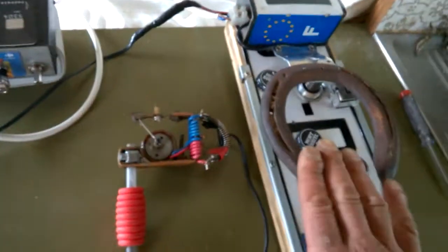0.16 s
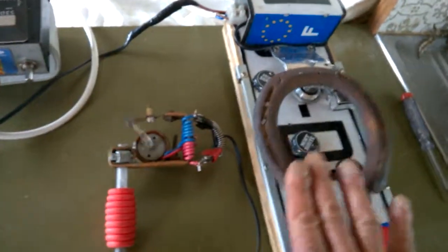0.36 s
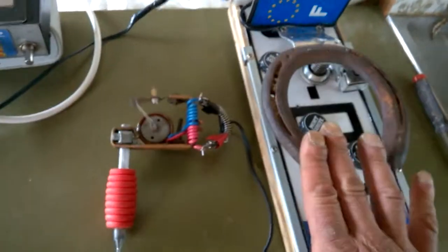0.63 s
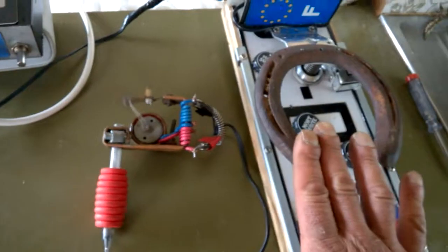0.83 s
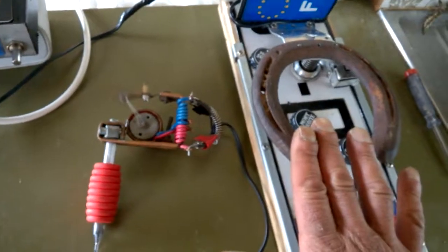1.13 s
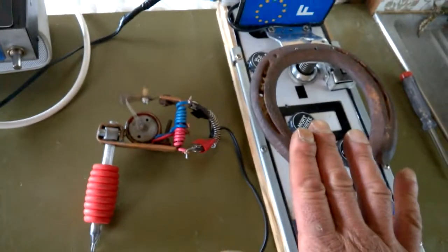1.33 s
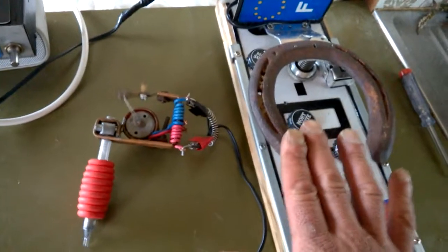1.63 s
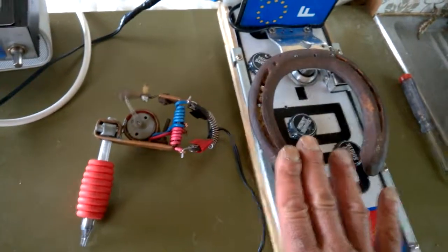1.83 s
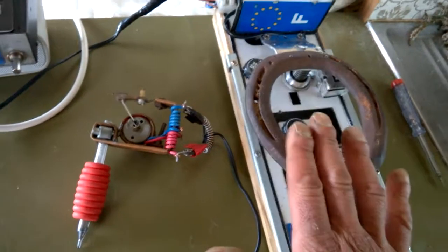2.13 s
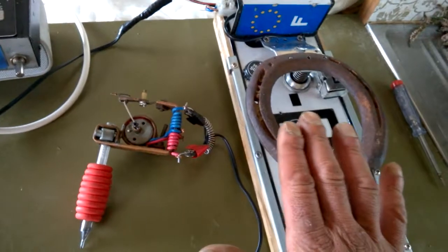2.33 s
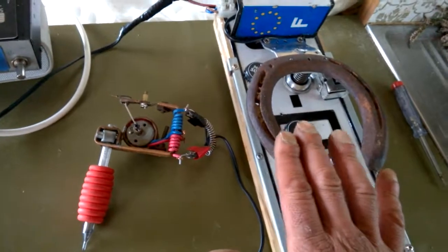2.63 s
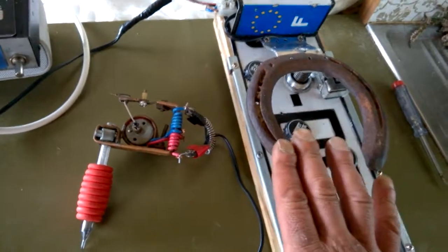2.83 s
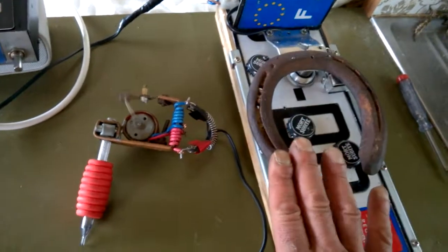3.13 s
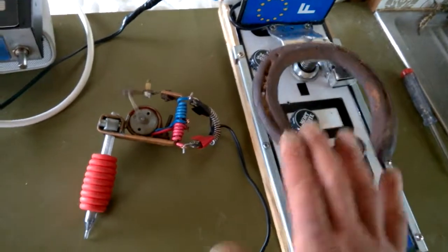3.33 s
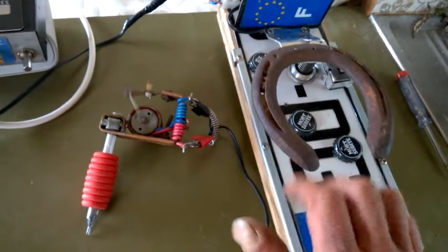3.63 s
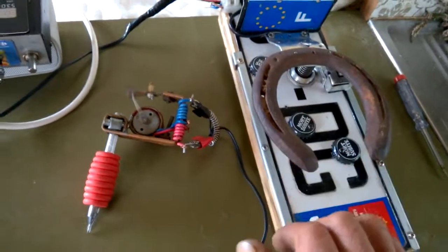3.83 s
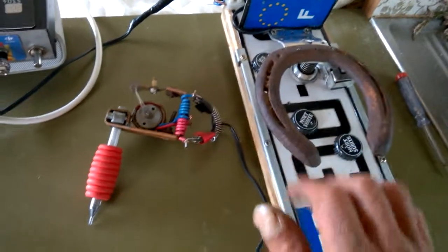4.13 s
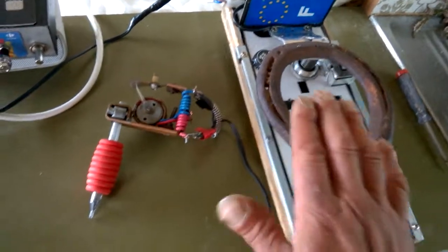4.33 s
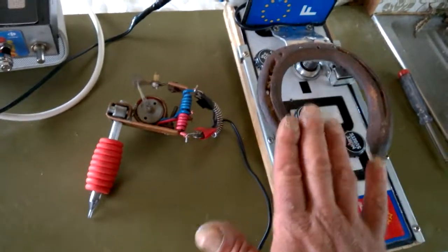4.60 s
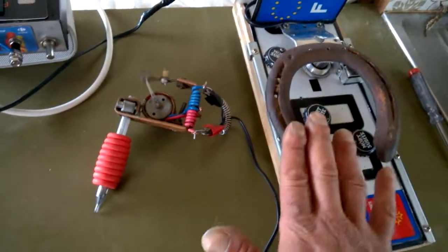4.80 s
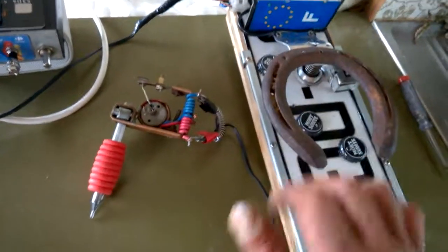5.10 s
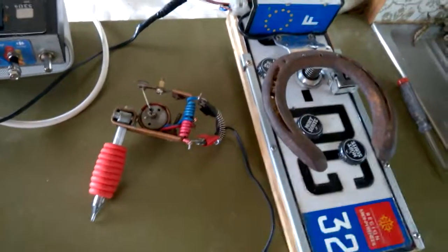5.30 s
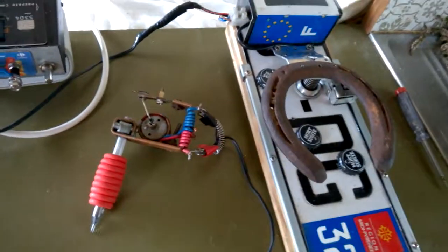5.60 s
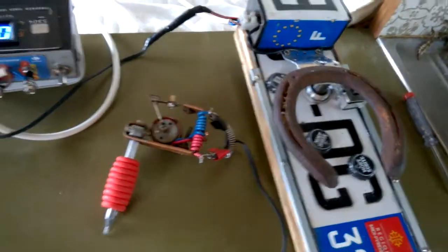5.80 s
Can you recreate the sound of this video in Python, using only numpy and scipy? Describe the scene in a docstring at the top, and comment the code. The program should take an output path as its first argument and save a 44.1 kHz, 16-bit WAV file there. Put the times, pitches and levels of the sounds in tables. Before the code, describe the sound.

A small tattoo machine on a table buzzes twice with a fast knocking rattle, clicking on and coasting to a stop.

```python
"""A homemade rotary tattoo machine lies on a table in a small room. Its switch clicks, the motor spins up,
and once a turn the crank throws the needle bar and knocks the frame on the table. The frame rocks, so
the knocks limp strong-weak, while the motor's contacts whirr and now and then spit. At 2 s it is switched
off and coasts to rest with a squeak. A second run follows from 3.1 s to 4.9 s and ends the same way;
near 5.8 s a few last metallic clicks sound in the quiet room."""
import sys
import numpy as np
from scipy import signal
from scipy.fft import rfft, irfft, next_fast_len
from scipy.io import wavfile
from scipy.ndimage import uniform_filter1d

SR = 44100
rng = np.random.default_rng(int(sys.argv[2]) if len(sys.argv) > 2 else 0)


def file_out(sig):
    """Save sig as 16-bit WAV at sys.argv[1]."""
    # one column per channel
    cols = np.atleast_2d(sig).T
    # limit, then scale
    lim = np.clip(cols, -1, 1)
    pcm = np.round(lim * 32767).astype(np.int16)
    wavfile.write(sys.argv[1], SR, pcm)


N = 262395
TIME = np.arange(N) / SR

# Motor runs: (switch-on [s], switch-off [s], spin-up [s], knock level [dB], slap level [dB],
# landing hardness [dB/octave], unsteadiness [0-1])
MOTOR_RUNS = [(0.3755, 2.022, .086, -28, -41, 1.5, 0.4), (3.0643, 4.927, .073, -27.5, -40.5, 0, 0.55)]
# Spells of another rocking gait and what each adds: (start [s], end [s], knock [dB], slap [dB],
# hardness [dB/octave], lead of every second stroke [s], limp [dB], four-stroke sway [dB],
# ringing [dB], rumble [dB])
GAIT_SPELLS = [(0.556, 0.683, -0.5, -6.5, -3, 0.0008, 2, 0, 1.5, 0.5),
               (0.763, 1.28, -1.5, -3.5, 5.5, 0.004, 1.8, -0.5, -3.5, -1),
               (1.295, 1.415, 0.5, 0.5, 2, 0.00052, .3, -0.5, -3, -1.5),
               (3.347, 3.6, 0.4, 0, -2, 0, 0.7, -1, 1.5, 1), (3.75, 3.81, -2, -6.5, -2, 0, -2, -1, 3, 1),
               (3.878, 4.27, 0.9, -6, -2, 0.0003, -1.2, 4.5, 0, 0),
               (4.437, 4.926, -2, -.5, 2, 0.0006, -2, 1, 0.5, 2.5)]
# Single harder or lighter strokes: (time [s], knock accent [dB], slap accent [dB])
STROKE_ACCENTS = [(.443, -4, -9), (.472, -7, -0.5), (.498, 5.5, 1), (.524, -9, 1.5), (.551, 1, 3.5),
                  (1.524, 0, -2.5), (1.629, 4, 3.5), (1.788, -4, 1), (1.84, 3, 2), (1.893, 2.5, 1),
                  (1.92, 0, -4), (1.947, 0, -3), (1.972, 0, -8), (1.998, -2.5, 0), (2.056, 5.5, -4),
                  (2.096, 17, 9.5), (3.128, -4, -10), (3.155, -1.5, -8), (3.183, -4, -1), (3.235, 6, 3.5),
                  (3.366, -1, 2), (3.419, -2, 0.5), (3.471, 2, 0), (3.604, 4.5, -10), (3.655, 6.5, 2),
                  (3.681, 1, 0.5), (3.734, 3, 0), (3.839, 0.5, 2.5), (3.997, 1, 2), (4.181, 0, 6),
                  (4.285, -3, 1), (4.207, 1.5, 2), (4.235, -1, -15), (4.34, 3, 2), (4.365, 0.5, 1),
                  (4.418, 3, 0), (4.496, 4.5, 2), (4.524, -1, -12), (4.55, 2.5, -22), (4.602, 3, 4.5),
                  (4.707, 5, 5.5), (4.734, 2, -2), (4.76, 7.5, 5), (4.787, 3.5, -7), (4.813, -6, 1),
                  (4.837, -1, -4), (4.865, -12, -10), (4.944, 5.5, 4)]
# Modes of the frame and table top: (frequency [Hz], bandwidth [Hz], gain [dB])
FRAME_MODES = [(78, 30, -9), (116, 22, -10), (154, 20, -10), (229, 22, 4), (267, 23, 5.5), (303, 24, 10),
               (381, 15, 3), (419, 15, 1), (457, 15, -4), (496, 18, -4), (535, 25, -10)]
# Bands that the table top delays: (frequency [Hz], bandwidth [Hz])
TABLE_DELAY_BANDS = [(225, 21)]
# Modes of the needle bar and tube: (frequency [Hz], bandwidth [Hz], gain [dB])
BAR_MODES = [(722.5, 23, 8.5), (863.3, 65, 10.5), (1094, 47, 0), (1169, 46, 2.5), (1216.5, 20.6, 5),
             (1247, 9, -2.5), (1476, 20, -3.5), (1522, 16, -1.5), (1668, 23, 4), (2160, 87, -2.5)]
# Jolts of the frame as the motor starts and settles: (time [s], level [dB])
FRAME_JOLTS = [(0.393, -32), (2.187, -41.5), (3.079, -32), (4.966, -26), (5.036, -34)]
# Shudders of the frame: (time [s], peak level [dB], frequency [Hz], swell time [s])
FRAME_SHUDDERS = [(.412, -38, 236, 0.014), (.441, -24, 305, 0.0085), (.461, -27, 260, 0.0065),
                  (2.137, -35.5, 174.4, 0.023), (2.196, -45, 163, 0.023), (3.094, -35, 186, 0.0094),
                  (3.124, -24.5, 303, 0.0092), (3.145, -26.5, 226, 0.0069), (5.051, -33, 168, 0.0095)]
# Overtones of the lightly riding frame: (multiple of crank rate [1], relative level [dB])
HUM_HARMONICS = [(15, -53), (16, -60), (17, -54), (19, -58), (23, -55), (27, -60), (32, -57), (46, -65)]
# Broad response of the motor housing: (frequency [Hz], gain [dB])
HOUSING_RESPONSE = [(900, 8), (1600, 7), (1900, 2), (2500, 0), (3100, 0), (3500, -3.5), (4300, -6),
                    (5100, -3.5), (5700, -3), (7400, 0.5), (8000, -2), (9200, -4.5), (10000, -9.5),
                    (12000, -16), (14000, -19), (16000, -17)]
# Modes of the motor housing: (frequency [Hz], bandwidth [Hz], gain [dB])
HOUSING_MODES = [(2180, 60, 0), (2403, 45, 5), (2800, 150, 2), (3000, 200, 0), (5660, 140, -5),
                 (6150, 130, 1), (6800, 160, -2), (7330, 260, -4), (8230, 90, -7), (8480, 90, -7),
                 (12280, 200, 8.5)]
# Motor whine: (multiple of crank rate [1], relative level [dB])
WHINE_HARMONICS = [(43, -15), (44, -18), (63, -12), (73, -24), (76, -25)]
# Pedal, switch and loose metal parts: (time [s], level [dB], centre [Hz], bandwidth [Hz], decay [s])
METAL_CLICKS = [(.33, -52, 523, 248, 0.007), (.3755, -45, 6860, 5630, 0.011), (.42, -41, 67.6, 30.2, 0.05),
                (2.104, -64, 7950, 6000, 0.0051), (3.0645, -43.5, 7240, 4940, 0.0051),
                (5.8138, -38.5, 2750, 2200, 0.0012), (5.814, -45.5, 7860, 9000, 0.0023),
                (5.8268, -50, 13500, 4000, .0004), (5.8373, -45, 3800, 1010, 0.0015),
                (5.8376, -40, 6300, 2390, 0.0013), (5.901, -60, 5960, 7000, .001),
                (5.938, -60, 7300, 1400, .002)]
# Spitting contacts: (time [s], level [dB], centre [Hz], bandwidth [Hz], decay [s])
CONTACT_SPARKS = [(.414, -52, 13100, 5000, 0.01), (.595, -51.5, 12000, 7020, 0.013),
                  (1.80, -56, 13300, 6560, 0.017), (2.022, -43, 6900, 11000, 0.013),
                  (3.11, -48, 13700, 5000, 0.005), (3.337, -50, 13000, 6300, 0.018),
                  (4.69, -55, 13000, 6060, .012), (4.927, -37.5, 6570, 10700, 0.011)]
# Squeaks and groans of the stopping crank: (time [s], level [dB], centre [Hz], bandwidth [Hz], decay [s])
CRANK_SQUEAKS = [(2.143, -47, 7000, 610, 0.0055), (2.15, -48.5, 493, 110, 0.04),
                 (5.008, -39, 481, 71, 0.031), (5.013, -43.5, 7140, 400, 0.007),
                 (5.038, -44.5, 6650, 920, 0.0056), (5.092, -62, 13100, 400, 0.012),
                 (5.1, -62, 4870, 250, 0.039)]
# Background noise of the room: (frequency [Hz], relative spectral density [dB])
AIR_SPECTRUM = [(12, -20), (20, -10.5), (65, -4.5), (172, -17), (198, -22), (255, -22.5), (738, -30),
                (802, -29), (1960, -30), (2910, -34.5), (4180, -35.5), (11400, -40.5), (16000, -38)]

TURNS_PER_S, COAST_S = 38.0, .15  # full speed; time in which friction stops the crank
KNOCK_LAW, SLAP_LAW, WHIRR_LAW = 1.03, 1.86, 0.94  # each amplitude grows as this power of speed
WHIRR_DB, INRUSH_DB = -48.5, 9  # base level; extra while the starting current flows
LIMP_DB, RUMBLE_DB = 2.5, -27.5  # strong-weak accent; rumble relative to the knock
SLOW_TILT_DB = -9  # per octave: a crank near rest lands softer


def crank():
    """Rotation drives the machine: turns completed, fraction of full speed and starting current."""
    turns, speed, inrush = np.zeros((3, N))
    for on, off, spin_up_s, *_ in MOTOR_RUNS:
        share = np.clip(np.minimum((TIME - on) / spin_up_s, 1 - (TIME - off) / COAST_S), 0, 1)
        turns += (share > 0) * np.cumsum(share) * TURNS_PER_S / SR
        speed += share
        inrush += (TIME > on) * (TIME < off) * (1 - share)
    return turns, speed, inrush


def run_settings():
    """Excitation in each run: knock level, slap level, hardness and unsteadiness over time."""
    runs = np.array(MOTOR_RUNS)
    current = np.maximum(np.searchsorted(runs[:, 0], TIME) - 1, 0)
    return runs[current, 3:].T


def gait(fade_s=0.027):
    """A rocking body has several gaits: the offsets of each spell fade in and out."""
    return sum(np.outer(offsets, spell(start, end, fade_s)) for start, end, *offsets in GAIT_SPELLS)


def strokes(turns, lead_s, limp_db, sway_db, unsteady, lag_s=0.00131, jitter_s=0.00042):
    """Subharmonic rocking: one stroke a turn, with accents that repeat every two and four strokes."""
    when, count = crossings(turns)
    lead_s, limp_db, sway_db, unsteady = (
        np.interp(when, TIME, curve) for curve in (lead_s, limp_db, sway_db, unsteady))
    limp_db = limp_db * np.cos(np.pi * count)
    sway_db = -sway_db * np.cos(np.pi * count / 2)
    knock_db = limp_db + 0.49 * sway_db
    slap_db = 0.28 * limp_db + sway_db
    for time_s, knock_accent_db, slap_accent_db in STROKE_ACCENTS:
        nearest = np.argmin(np.abs(when - time_s))
        knock_db[nearest] += knock_accent_db
        slap_db[nearest] += slap_accent_db
    when = when + lag_s - lead_s * (count % 2 == 0)
    when += jitter_s * unsteady * rng.standard_normal(len(when))
    return (when, knock_db, unsteady), (when, slap_db, unsteady)


def frame(knocks, knock_db, tilt_db, ring_db, rumble_db, rock_s=0.00874, rock_db=-14, contact_s=0.0017):
    """Impact excites modes: the frame thuds, rocks onto its other edge, rings and shuffles on the table."""
    when, accent_db, unsteady = knocks
    chance = rng.standard_normal((len(when), 2 + len(FRAME_MODES)))
    level_db = np.interp(when, TIME, knock_db)
    force = from_db(level_db + accent_db)
    landing = when - 0.00284  # the blow starts slightly early, so its filtered peak lands on the stroke
    rocking = landing + rock_s + 0.00043 * unsteady * chance[:, 0]
    rock_force = force * from_db(rock_db + 10 * unsteady * chance[:, 1])
    push = impulses(landing, force) + impulses(rocking, rock_force)
    softness = np.clip(tilt_db / -7, 0, 1)  # a soft landing lasts longer
    soft_push = uniform_filter1d(push, int(contact_s * SR))
    thud = bandpass((1 - softness) * push + softness * soft_push, (145, 460))
    ringing = 0
    for (hz, width_hz, db), spread_db in zip(FRAME_MODES, chance[:, 2:].T):
        # Each blow lands on a slightly different spot, so each mode's share varies.
        size = from_db(level_db + 0.64 * accent_db + unsteady * spread_db)
        gain = from_db(db + ring_db + tilt_db * np.log2(hz / 270))
        ringing += resonance(impulses(landing + .001, size) * gain, hz, width_hz)
    rumble = bandpass(rng.standard_normal(N) * from_db(knock_db + rumble_db), (115, 330))
    knocking = lowpass(thud + table_dispersion(ringing) + rumble, 600, order=4)
    return from_db(-0.9) * at_level(knocking, knock_db)


def table_dispersion(x):
    """Bending waves in the table top disperse: an all-pass draws the ringing out into a hum."""
    for hz, width_hz in TABLE_DELAY_BANDS:
        radius = np.exp(-np.pi * width_hz / SR)
        poles = [1, -2 * radius * np.cos(2 * np.pi * hz / SR), radius * radius]
        x = signal.lfilter(poles[::-1], poles, x)
    return x


def needle_bar(slaps, slap_db, lead_s=0.00048, bounce_s=0.002552, rattle_db=-6, rattle_s=0.016):
    """Impact and rebound: the bar slaps, bounces once and rattles on, exciting the modes of bar and tube."""
    when, accent_db, unsteady = slaps
    chance = rng.standard_normal((len(when), 3)).clip(-2, 1.2) * unsteady[:, None]
    force = from_db(np.interp(when, TIME, slap_db) + accent_db + 2.5 * chance[:, 0])
    strike = when - lead_s
    bounce = strike + bounce_s + 0.00011 * chance[:, 1]
    slap = impulses(strike, force) + impulses(bounce, force * from_db(-2 + 7.6 * chance[:, 2]))
    envelope = signal.lfilter([1], [1, -np.exp(-1 / (rattle_s * SR))], slap + 1e-18)
    rattle = envelope * rng.standard_normal(N)
    ringing = modal_response(rms_one(slap) + from_db(rattle_db) * rms_one(rattle), BAR_MODES)
    return from_db(-1.53) * at_level(bandpass(ringing, (650, 1800), order=3), slap_db)


def jolts(contact_s=0.0065):
    """Long contact favours low modes: soft single bumps of the frame."""
    when, db = np.transpose(FRAME_JOLTS)
    push = smear(impulses(when, from_db(db)), contact_s)
    bumps = lowpass(modal_response(push, FRAME_MODES), 230)
    return bumps * from_db(db.max()) / np.abs(bumps).max()


def shudders():
    """Passage through resonance: brief low tones swell at set times as the speed rises or falls."""
    return sum(from_db(db) * np.exp(-((TIME - at) / swell_s) ** 2) * np.sin(2 * np.pi * hz * (TIME - at))
               for at, db, hz, swell_s in FRAME_SHUDDERS)


def hum(turns, start_s=0.64, end_s=1.53, fade_s=0.22, gain_db=3):
    """Periodic motion gives harmonics: overtones of the stroke sing while the frame rides lightly."""
    tones = sum(from_db(db + gain_db) * np.sin(2 * np.pi * (multiple * turns + rng.random()))
                for multiple, db in HUM_HARMONICS)
    return spell(start_s, end_s, fade_s) * tones


def whirr(turns, speed, whirr_db, spots=90, jitter_s=.00002, hiss_db=-5, load_db=3.0, scatter_s=0.0063):
    """Periodic friction: brushes and bearings meet the same rough spots every turn, and the motor whines."""
    when, count = crossings(turns * spots)
    spot = count % spots
    spot_sign = rng.choice([-1., 1.], spots)
    spot_offset_s = .0002 * rng.standard_normal(spots)
    when = when + spot_offset_s[spot] + jitter_s * rng.standard_normal(len(when))
    ticks = impulses(when, spot_sign[spot] * (1 + 1.19 * rng.standard_normal(len(when))))
    scrape = rms_one(ticks + 0.86 * smear(ticks, scatter_s))
    hiss = from_db(hiss_db) * rms_one(np.sqrt(speed) * rng.standard_normal(N))
    swing_db = load_db * np.cos(2 * np.pi * (turns - 0.17))  # the load peaks just after the knock
    rub = colour((scrape + hiss) * from_db(swing_db + whirr_db), HOUSING_RESPONSE)
    housing = at_level(rub + modal_response(rub, HOUSING_MODES), whirr_db)
    wobble = .002 * np.interp(TIME, np.linspace(0, TIME[-1], 200), rng.standard_normal(200))
    whine = sum(from_db(db) * np.sin(2 * np.pi * multiple * (turns + wobble))
                for multiple, db in WHINE_HARMONICS)
    return from_db(3.5) * housing + whine * speed ** 4 * from_db(whirr_db)


def crank_pin(turns, whirr_db, reversal_turn=.74, hz=7280, width_hz=260, relative_db=-11):
    """Impulse response of one high mode: the crank pin tinks as the stroke reverses."""
    when, _ = crossings(turns - reversal_turn)
    size = from_db(np.interp(when, TIME, whirr_db) + 3 * rng.standard_normal(len(when)))
    ring = resonance(impulses(when, size), hz, width_hz)
    return from_db(relative_db) * at_level(resonance(ring, hz, 2 * width_hz), whirr_db)


def transients(events, gain_db):
    """Damped transients: each click, spark or squeak is decaying noise in its own band."""
    out = np.zeros(N)
    for time_s, db, hz, width_hz, decay_s in events:
        edges_hz = np.clip([hz - width_hz / 2, hz + width_hz / 2], 25, .45 * SR)
        snap = bandpass(burst(decay_s), edges_hz)
        start = int(time_s * SR)
        snap = snap[:N - start] * from_db(db + gain_db) / np.abs(snap).max()
        out[start:start + len(snap)] += snap
    return out


def room(x, wet_db, t60_s=0.26, delay_s=.004):
    """Reverberation: a short diffuse tail follows the direct sound."""
    tail = np.pad(smear(x, t60_s / np.log(1000)), (int(delay_s * SR), 0))[:N]
    return x + from_db(wet_db) * lowpass(tail, 8000, order=1)


def room_air(level_db=-61.5):
    """Stationary noise: the quiet room, strongest in the bass."""
    return from_db(level_db) * rms_one(colour(rng.standard_normal(N), AIR_SPECTRUM))


def from_db(db):
    """Decibels to amplitude ratio."""
    return 10 ** (np.asarray(db) / 20)


def rms_one(x):
    """Normalisation to unit rms."""
    return x / np.sqrt(np.mean(x ** 2) + 1e-20)


def at_level(x, level_db):
    """Normalisation to the mean power of a level curve."""
    return rms_one(x) * np.sqrt(np.mean(from_db(level_db) ** 2))


def spell(start_s, end_s, fade_s):
    """A trapezoidal window, half open at its start and end times."""
    return np.clip(np.minimum(TIME - start_s, end_s - TIME) / fade_s + .5, 0, 1)


def crossings(turns):
    """The times at which a phase in turns reaches a whole number, and those numbers."""
    at = np.flatnonzero(np.diff(np.floor(turns)) > 0) + 1
    return at / SR, np.floor(turns[at]).astype(int)


def impulses(when, size):
    """An impulse train."""
    return np.bincount(np.clip(when * SR, 0, N - 1).astype(int), size, N)


def burst(decay_s):
    """Exponentially decaying noise of unit energy."""
    t = TIME[:SR // 2]
    noise = rng.standard_normal(len(t)) * np.exp(-t / decay_s)
    return noise / np.sqrt(np.sum(noise ** 2))


def smear(x, decay_s):
    """Convolution spreads every click into a dense, dying cluster."""
    return signal.fftconvolve(x, burst(decay_s))[:N]


def resonance(x, hz, width_hz):
    """A damped oscillator: two poles, unit gain at the peak."""
    radius = np.exp(-np.pi * width_hz / SR)
    poles = [1, -2 * radius * np.cos(2 * np.pi * hz / SR), radius * radius]
    return signal.lfilter(np.array([1, 0, -1]) * (1 - radius * radius) / 2, poles, x + 1e-18)


def modal_response(x, modes):
    """Superposition: a body responds as the sum of its modes."""
    return sum(from_db(db) * resonance(x, hz, width_hz) for hz, width_hz, db in modes)


def colour(x, response):
    """Spectral shaping by a response interpolated over log frequency."""
    hz, db = np.transpose(response)
    length = next_fast_len(N)
    bins_hz = np.maximum(np.fft.rfftfreq(length, 1 / SR), 1)
    gain = from_db(np.interp(np.log(bins_hz), np.log(hz), db))
    return irfft(rfft(x, length) * gain, length)[:N]


def bandpass(x, edges_hz, order=2):
    """A maximally flat band-pass."""
    return signal.sosfilt(signal.butter(order, edges_hz, "band", fs=SR, output="sos"), x + 1e-18)


def lowpass(x, hz, order=2):
    """A maximally flat low-pass."""
    return signal.sosfilt(signal.butter(order, hz, fs=SR, output="sos"), x)


def scene():
    """Superposition of machine and room; the crank's speed sets how hard the parts strike and rub."""
    turns, speed, inrush = crank()
    speed_db = 20 * np.log10(speed + 1e-6)
    run_knock_db, run_slap_db, run_tilt_db, unsteady = run_settings()
    gait_knock_db, gait_slap_db, gait_tilt_db, lead_s, limp_db, sway_db, ring_db, rumble_db = gait()
    knock_db = run_knock_db + gait_knock_db + KNOCK_LAW * speed_db
    slap_db = run_slap_db + gait_slap_db + SLAP_LAW * speed_db
    tilt_db = run_tilt_db + gait_tilt_db + SLOW_TILT_DB * (1 - speed)
    whirr_db = WHIRR_DB + INRUSH_DB * inrush + WHIRR_LAW * speed_db
    knocks, slaps = strokes(turns, lead_s, LIMP_DB + limp_db, sway_db, unsteady)
    knocking = frame(knocks, knock_db, tilt_db, ring_db, RUMBLE_DB + rumble_db) + jolts() + shudders()
    thumping = room(knocking + needle_bar(slaps, slap_db) + hum(turns), wet_db=-15)
    buzzing = room(whirr(turns, speed, whirr_db) + crank_pin(turns, whirr_db), wet_db=-4)
    clicks = transients(METAL_CLICKS, gain_db=4.5)
    sparks = transients(CONTACT_SPARKS, gain_db=5.5)
    squeaks = transients(CRANK_SQUEAKS, gain_db=-1.5)
    small_sounds = room(clicks + sparks + squeaks, wet_db=-10)
    return (thumping + buzzing + small_sounds + room_air())[None]


def record(dry, cutoff_hz=15800):
    """Band limiting: a steep low-pass removes the highest treble."""
    return signal.sosfilt(signal.ellip(12, .1, 80, cutoff_hz, fs=SR, output="sos"), dry)


dry = scene()
out = record(dry)
file_out(out)
```